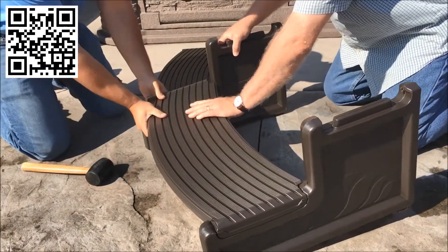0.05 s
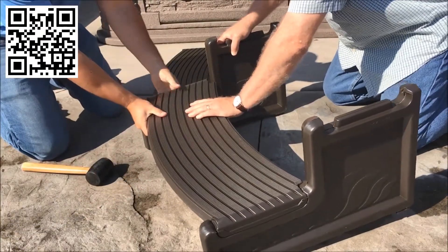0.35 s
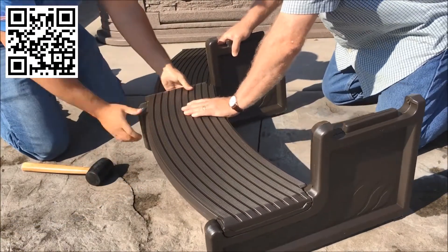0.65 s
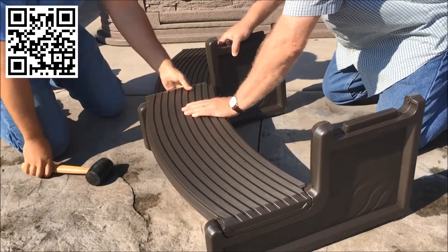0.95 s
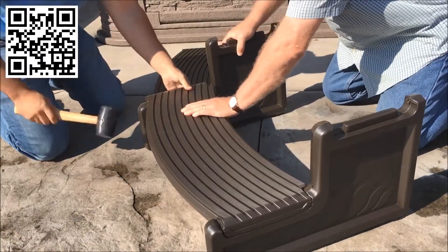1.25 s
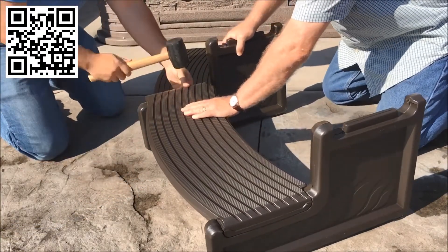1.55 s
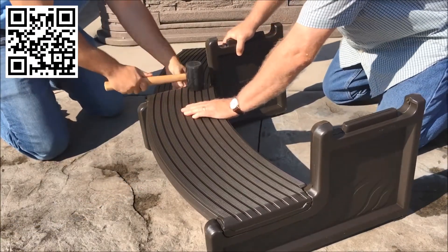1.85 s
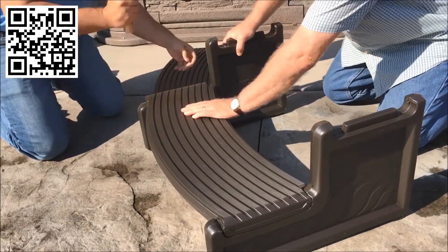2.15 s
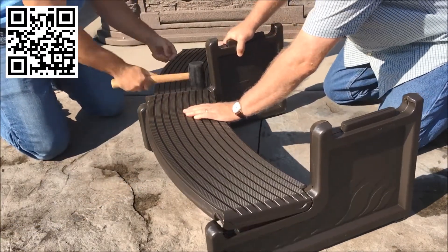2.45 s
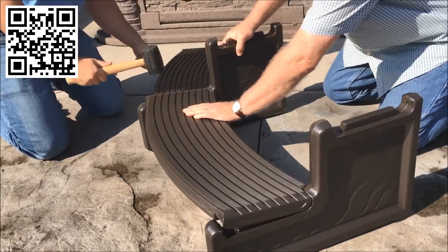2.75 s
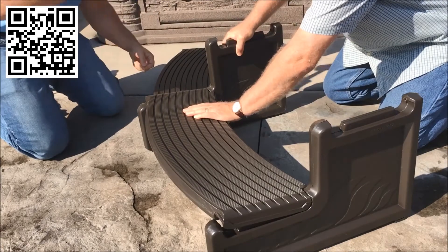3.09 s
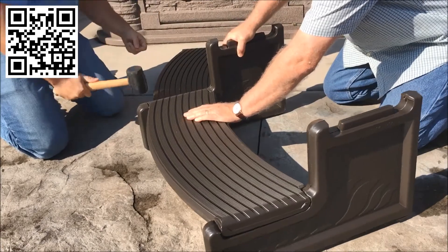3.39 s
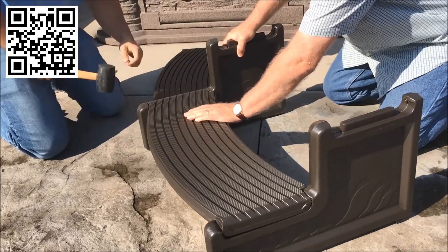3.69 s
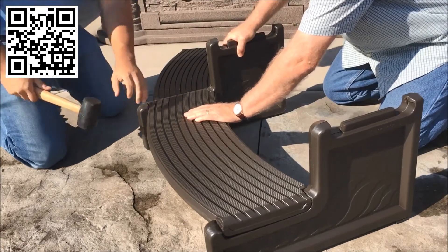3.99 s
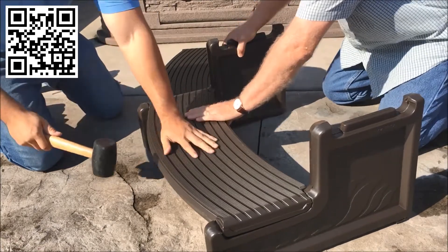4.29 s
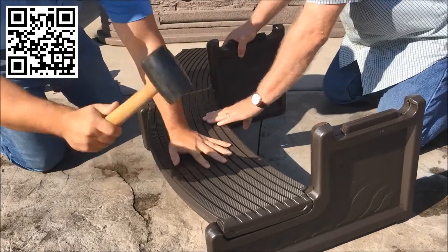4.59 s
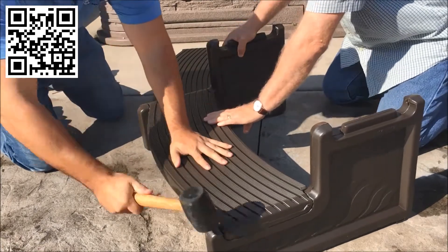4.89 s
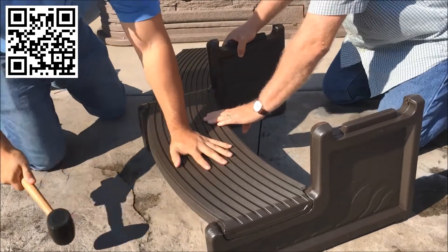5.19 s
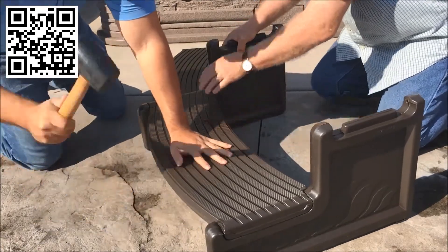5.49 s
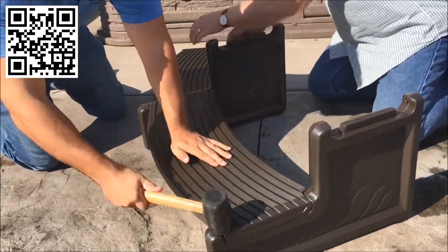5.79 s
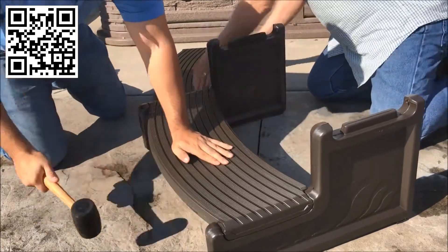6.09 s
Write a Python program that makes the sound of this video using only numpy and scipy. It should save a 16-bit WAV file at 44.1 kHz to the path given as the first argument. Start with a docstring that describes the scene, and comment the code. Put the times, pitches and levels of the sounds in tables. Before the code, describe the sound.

A rubber mallet knocks a plastic step tread into place outdoors. Hands first bump and scuff the plastic softly, then comes one light tap, followed by four hard, hollow knocks, each with a bright snap and a short ring. Behind them a wind chime tinkles faintly, leaves hiss and a breeze rumbles on the microphone. The background dips briefly after each hard blow.

```python
"""One light tap, then four hard, hollow knocks: a rubber mallet seats a plastic step tread on a patio.
Each blow flexes the tread, snaps its joint and sets the panels ringing; hands bump and scuff the plastic.
Behind it a faint wind chime tinkles, leaves hiss and a breeze rumbles on the microphone.
Automatic gain control ducks the whole mix after every hard knock."""
import sys
import numpy as np
from scipy import signal
from scipy.fft import rfft, irfft
from scipy.io import wavfile
from scipy.ndimage import uniform_filter1d, minimum_filter1d

SR = 44100
rng = np.random.default_rng(int(sys.argv[2]) if len(sys.argv) > 2 else 0)


def unload_audio(sound):
    """Save the sound as a 16-bit wav file, at the path given as the first command line argument."""
    columns = np.transpose(np.atleast_2d(sound))
    # keep every value between -1 and 1, then stretch to whole-number steps
    steps = np.round(np.clip(columns, -1, 1) * 32767)
    wavfile.write(sys.argv[1], SR, steps.astype(np.int16))


N = 279831
TIME = np.arange(N) / SR
RING_TIME = np.arange(SR // 2) / SR

# Mallet blows: (time [s], strength [dB], spot struck [0-4], snap trim [dB], clatter trim [dB],
# clatter tilt [dB/octave], snap tilt [dB/octave], nearest rib's resonance [Hz], rib boost [dB],
# slip delay [s], slip trim [dB], thud trim [dB])
BLOWS = [(1.978, -3.5, 0, -9.5, -5.5, -3.5, -3.5, 4100, 14.5, .003, -26, -17.5),
         (2.5228, 15.5, 1, -2.5, -3.5, -0.23, -4.5, 2550, 4.5, .0105, -19.5, -14),
         (3.408, 15, 2, -5.5, -0.5, -0.3, -4, 2640, 4.5, 0.0054, -6.5, -11),
         (5.0170, 15.5, 3, .5, -3, -0.5, -3, 6200, 2.5, 0.013, -25, -20),
         (5.9377, 15.5, 4, -5, 0, -1.4, 5.5, 2220, 5.5, 0.014, -23, -29)]


def mallet(snap_db=-15, snap_t60=0.044, slip_t60=0.019, slip_tilt_db=-2.5, press_db=-36, lead_s=0.01045):
    """The rubber head presses the tread down; then the joint snaps, the panels ring, the joint slips."""
    # Small ticks of the joint around a blow: (time [s], level [dB])
    ticks = [(2.5, -34), (2.5797, -25), (4.994, -35)]
    out = np.zeros(N)
    for (s, db, spot, joint_db, panel_db, tilt_db, snap_tilt_db,
         rib_hz, rib_db, slip_after_s, slip_db, thud_db) in BLOWS:
        stretch = 0.51 * 2 ** (db / 22.5)  # harder blows shake more of the step and ring longer
        body = step_modes(spot, stretch) + amp(thud_db) * thud()
        panels = amp(panel_db) * clatter(tilt_db, stretch, rib_hz, rib_db)
        joint = amp(joint_db + snap_db) * snap(snap_t60, snap_tilt_db)
        add(out, s - lead_s, amp(db + press_db) * flex(hz=115, half_s=0.0093))
        add(out, s, amp(db) * (body + panels + joint))
        add(out, s + slip_after_s, amp(db + slip_db) * snap(slip_t60, slip_tilt_db))
    for s, db in ticks:
        add(out, s, amp(db) * snap(t60=0.012, tilt_db=slip_tilt_db))
    return out


def step_modes(spot, stretch, spread_s=0.0058, path_s=0.00077, level_db=2):
    """The pitched body of the knock: where the mallet lands sets how much each mode rings."""
    # Strong modes of the step: (frequency [Hz], t60 before stretch [s], then level [dB] when struck
    # at spot 0 far top, 1 far corner, 2 far rim, 3 middle rim, 4 near rim)
    modes = [(68, .3, -30, -31, -44, -27, -26), (84, .22, -38, -30, -44, -28, -27),
             (113, .23, -34, -27, -36, -25, -24), (128, .24, -29, -25, -25, -22, -26),
             (152, .16, -30, -30, -23, -24, -26), (172, .17, -23, -26, -28, -18, -17),
             (186, .18, -19, -21, -17, -23, -25), (195, .16, -24, -20, -16, -34, -34),
             (208, .18, -28, -28, -28, -21, -19), (255, .16, -19, -35, -33, -24, -22),
             (285, .19, -20, -42, -17, -18, -15), (349, .16, -24, -26, -26, -18, -23),
             (384, .16, -22, -24, -27, -25, -21), (419, .19, -21, -19, -25, -30, -24),
             (457, .17, -22, -32, -27, -29, -34), (557, .16, -22, -32, -34, -26, -24),
             (618, .16, -29, -25, -31, -29, -26), (686, .15, -36, -27, -30, -23, -24),
             (755, .15, -36, -25, -31, -27, -29), (790, .15, -35, -27, -31, -28, -27),
             (904, .15, -30, -33, -30, -24, -26), (965, .15, -34, -28, -22, -34, -28),
             (1100, .16, -33, -31, -21, -24, -28), (1360, .16, -31, -31, -32, -24, -25),
             (1488, .16, -35, -35, -33, -26, -29), (1608, .15, -36, -27, -28, -28, -33),
             (1684, .16, -35, -34, -24, -29, -32), (1876, .17, -32, -29, -28, -32, -27),
             (2312, .16, -42, -32, -31, -31, -27), (2592, .16, -42, -28, -27, -32, -25)]
    out = np.zeros(len(RING_TIME))
    for order, (hz, t60, *spot_db) in enumerate(modes):
        envelope = fade(RING_TIME, t60 * stretch) * build_up(hz, spread_s * stretch)
        ring = np.sin(2 * np.pi * hz * RING_TIME) * envelope
        side = (-1) ** order  # each further nodal line flips the side that faces the microphone
        add(out, path_s * np.sqrt(1000 / hz), side * amp(spot_db[spot] + level_db) * ring)
    return out


def clatter(tilt_db, stretch, rib_hz, rib_db, rib_octaves=0.2, spread_s=0.0025, level_db=-14):
    """Countless panel modes blur into noise, lifted at a rib's resonance; each band has its own decay."""
    # Dense panel modes: (frequency [Hz], spectral level [dB], t60 before stretch [s])
    bands = [(128, 8.5, 0.31), (300, 3, 0.33), (616, 1.5, 0.22), (1080, 3, 0.23), (2380, -0.5, 0.18),
             (3760, -8, 0.23), (5030, -18, 0.3), (6070, -12.5, 0.23), (10100, -19.5, 0.25),
             (15200, -17.5, 0.19)]
    size = len(RING_TIME)
    hz, db, t60 = np.transpose(bands)
    colour = np.column_stack([hz, db + tilt_db * np.log2(hz / 1000)])
    octaves = np.log2((np.fft.rfftfreq(size, 1 / SR) + 1) / rib_hz)
    rib_boost = amp(rib_db * np.exp(-(octaves / rib_octaves) ** 2))
    bins = rfft(noise([(hz[0] / 2, db[0] - 11), *colour], size)) * rib_boost
    out = np.zeros(size)
    for band_hz, band_t60, share in zip(hz, t60, np.eye(len(hz))):
        band = irfft(bins * on_log_axis(hz, share, size), size)
        out += band * build_up(band_hz, spread_s) * fade(RING_TIME, band_t60 * stretch)
    return amp(level_db) * out


def build_up(hz, spread_s):
    """Bending waves fill the panels, in spread_s at 1 kHz; low ones travel slower and swell later."""
    return 1 - np.exp(-RING_TIME / (spread_s * np.sqrt(1000 / hz)))


def thud(hz=184, t60=0.12, spread_s=0.0047, path_s=0.0019):
    """The air inside the hollow tread booms for a few cycles."""
    t = np.maximum(RING_TIME - path_s, 0)
    return -np.cos(2 * np.pi * hz * t) * fade(t, t60) * (1 - np.exp(-t / spread_s))


def snap(t60, tilt_db):
    """A bright crack as hard plastic slaps on plastic in the joint."""
    # Colour of the slap: (frequency [Hz], spectral level [dB])
    spectrum = [(300, -7.5), (1500, -8.5), (3500, 0), (5200, -5.5), (7000, -3), (10500, -7), (13000, -2.5),
                (16000, -15)]
    colour = [(hz, db + tilt_db * np.log2(hz / 4000)) for hz, db in spectrum]
    return noise(colour, len(RING_TIME)) * fade(RING_TIME, t60)


def flex(hz, half_s):
    """A soft, damped swing of the tread, centred half_s after its start."""
    t = np.arange(-half_s, half_s, 1 / SR)
    return -np.sin(2 * np.pi * hz * t) * np.exp(-(2 * t / half_s) ** 2)


def pre_knock_swell(level_db=-47, rise_t60=0.082):
    """A faint, brief swell of noise leads into each knock and softens its attack."""
    out = np.zeros(N)
    swell = fade(RING_TIME, rise_t60)[::-1]
    for s, db, *_ in BLOWS:
        dull_noise = noise([(60, -24), (250, 0), (1000, -6), (3000, -20), (7000, -31)], len(RING_TIME))
        add(out, s - RING_TIME[-1], amp(db + level_db) * dull_noise * swell)
    return out


def hands():
    """Dull bumps and short scuffs as hands hold and shift the tread."""
    # Soft bumps of the tread: (time [s], level [dB], pitch [Hz], half-length [s])
    bumps = [(0.027, -24.5, 118, 0.013), (.155, -29, 149, 0.0071), (0.238, -41, 378, 0.016),
             (.494, -27.5, 132, 0.0084), (0.692, -33, 178, 0.0082), (3.974, -31, 86.3, 0.028),
             (5.845, -28, 124, 0.014), (5.866, -26.5, 118, 0.018)]
    # The tread rubs the side panel: (time [s], level [dB], length [s], top-end hiss [dB])
    scuffs = [(0.229, -41, 0.032, -42), (.678, -45, 0.062, -26), (5.838, -49, 0.028, -35)]
    out = np.zeros(N)
    for s, db, hz, half_s in bumps:
        add(out, s - half_s, amp(db) * flex(hz, half_s))
    for s, db, length_s, hiss_db in scuffs:
        colour = [(150, -12), (380, -3.5), (700, -9), (2200, -12), (4500, -30), (14000, hiss_db)]
        rub = noise(colour, int(length_s * SR))
        add(out, s - length_s / 2, amp(db) * rub * np.hanning(len(rub)))
    return out


def patio(x, wet_db=-32, t60=0.69, onset_s=0.045):
    """Adds a faint tail of echoes scattered off the paving and the house wall."""
    # Colour of the tail: (frequency [Hz], spectral level [dB])
    spectrum = [(100, 6), (400, -9.5), (1200, -1), (2500, 7), (5000, 0), (9000, -12), (16000, -27)]
    onset = 1 - np.exp(-(RING_TIME / onset_s) ** 2)
    tail = noise(spectrum, len(RING_TIME)) * fade(RING_TIME, t60) * onset
    return x + amp(wet_db) * signal.fftconvolve(x, tail / np.linalg.norm(tail))[:N]


def wind_chime(ref_hz=4000, ref_t60=1.7, damping_power=1.53, attack_s=0.0057, twin_lag_s=0.017):
    """Close pairs of tube modes beat; high ones die sooner, and sharp touches favour them."""
    # Partials of each tube: (frequency [Hz], level [dB], beat rate [Hz], twin mode's share [dB])
    tubes = {"a": [(2100, -8, 7.4, -15), (4013, 0.5, 14.6, -2.5), (6405, -3.5, 20, -2)],
             "b": [(2622, -4, 7, -15), (4974, 0.5, 4.6, -26), (11260, -29, 40, -7)],
             "c": [(2810, -1, 3.7, -29)], "d": [(3100, -1.5, 2.7, -29)], "e": [(4455, 0, 12, -12)]}
    # The clapper touches a tube: (time [s], tube, strength [dB], brightness [dB/octave])
    tinkles = [(0, "e", -56.5, 0), (.371, "a", -47, -1.5), (.401, "b", -61, -15), (1.27, "a", -62.5, -20),
               (1.678, "b", -66, 31), (2.78, "c", -48, 4), (3.92, "b", -58, -11), (4.21, "e", -55.5, 0),
               (4.24, "d", -51, -1), (4.652, "b", -45.5, 2.5)]
    out = np.zeros(N)
    for s, tube, touch_db, bright_db in tinkles:
        for hz, db, beat_hz, twin_db in tubes[tube]:
            beating = 1 + amp(twin_db) * np.exp(2j * np.pi * beat_hz * (TIME - twin_lag_s))
            pair = (np.exp(2j * np.pi * hz * TIME) * beating).imag
            t60 = ref_t60 * (ref_hz / hz) ** damping_power
            envelope = fade(TIME, t60) * (1 - np.exp(-TIME / attack_s))
            add(out, s, amp(touch_db + db + bright_db * np.log2(hz / ref_hz)) * pair * envelope)
    return out


def leaves(level_db=-46.5):
    """A smooth hiss of distant leaves, stirring a little more as the breeze picks up."""
    # Colour of the hiss: (frequency [Hz], spectral level [dB])
    spectrum = [(88, -33), (150, -1.5), (201, -1.5), (249, -5), (348, -5), (475, -10), (649, -8.5),
                (759, -8.5), (1690, -9), (3160, -7.5), (4860, -15), (6390, -13), (11900, -22.5),
                (14800, -25), (16000, -41)]
    # Slow swells of the rustle: (time [s], level offset [dB])
    rustle = [(0, -1), (.7, 0.5), (2.4, 1.66), (3.2, -.5), (4.4, .5), (4.9, 2), (6.35, 1)]
    return amp(level_db + np.interp(TIME, *np.transpose(rustle))) * noise(spectrum, N)


def breeze(steady_db=-48.5, edge_s=0.031):
    """Wind rumbles on the microphone; a few gusts rise, hold and fall over the steady bed."""
    # Colour of the rumble: (frequency [Hz], spectral level [dB])
    spectrum = [(12, -41), (25, -27), (46, -2), (65, 2.5), (81, -2.5), (123, -8), (155, -11.5), (247, -20),
                (350, -28), (460, -39), (770, -120)]
    # Gusts: (start [s], length [s], level [dB])
    gusts = [(0, .06, -34.5), (0.09, 0.64, -46), (2.097, 0.52, -44), (3.897, .12, -40.5),
             (4.493, 0.12, -37.5), (4.638, 0.26, -41.5), (5.721, 0.18, -38)]
    power = amp(steady_db) ** 2
    for start, length, db in gusts:
        inside_s = np.minimum(TIME - start, start + length - TIME)
        power += (amp(db) * np.clip(0.5 + inside_s / edge_s, 0, 1)) ** 2
    return np.sqrt(power) * noise(spectrum, N)


def duck(x, threshold_db, depth_db, hold_s, release_s):
    """Gain control: peaks over the threshold pull the gain down; it holds, then climbs back."""
    over_db = np.clip(20 * np.log10(abs(x) + 1e-9) - threshold_db, 0, depth_db)
    half = max(int(hold_s * SR / 2), 1)
    held_db = -minimum_filter1d(-over_db, 2 * half + 1, origin=half)
    climb_db = TIME * depth_db / release_s
    cut_db = np.maximum.accumulate(held_db + climb_db) - climb_db
    ahead_db = -minimum_filter1d(-cut_db, size=41)  # a short look-ahead catches the first peak
    return x * amp(-uniform_filter1d(ahead_db, size=41))


def amp(db):
    """Decibels to gain."""
    return 10 ** (np.asarray(db) / 20)


def fade(t, t60):
    """Exponential decay, 60 dB down at t60."""
    return np.exp(-np.log(1000) * t / t60)


def add(mix, s, sound):
    """Mixes a sound in at time s."""
    part = mix[max(round(s * SR), 0):][:len(sound)]
    part += sound[:len(part)]


def on_log_axis(hz, values, size):
    """An EQ curve over the FFT bins, joining the points by straight lines in log frequency."""
    return np.interp(np.log(np.fft.rfftfreq(size, 1 / SR) + 1), np.log(np.asarray(hz) + 1), values)


def noise(spectrum, size):
    """Noise of rms 1, coloured by points of (frequency [Hz], spectral level [dB])."""
    hz, db = np.transpose(spectrum)
    x = irfft(rfft(rng.standard_normal(size)) * amp(on_log_axis(hz, db, size)), size)
    return x / np.sqrt(np.mean(x ** 2) + 1e-20)


def scene():
    """The knocks and their echoes up front, handling and garden air behind, in mono."""
    return (patio(mallet()) + pre_knock_swell() + hands() + wind_chime() + leaves() + breeze())[None]


def record(dry, cutoff_hz=15950):
    """Slow and quick gain control, a peak limiter, then a steep low-pass."""
    x = duck(dry[0], threshold_db=-14, depth_db=7.0, hold_s=0.38, release_s=0.24)
    x = duck(x, threshold_db=-13, depth_db=6.5, hold_s=0.16, release_s=0.038)
    x = duck(x, threshold_db=-6.0, depth_db=42, hold_s=0.0016, release_s=0.01)
    low_pass = signal.firwin(401, cutoff_hz, window=("kaiser", 9), fs=SR)
    return signal.oaconvolve(x, low_pass, "same")[None]


dry = scene()
out = record(dry)
unload_audio(out)
```